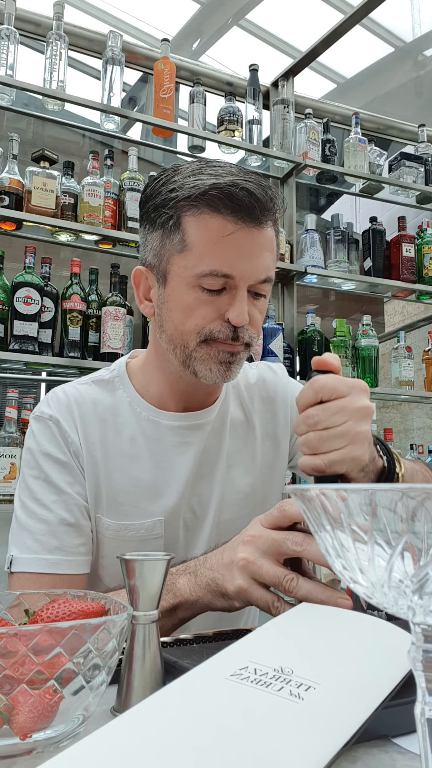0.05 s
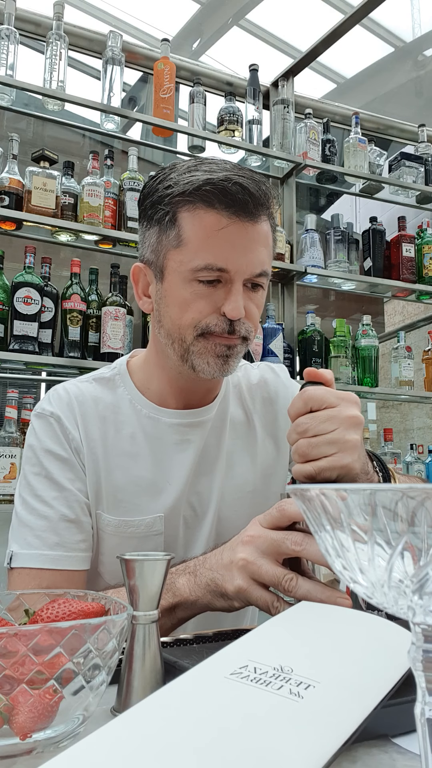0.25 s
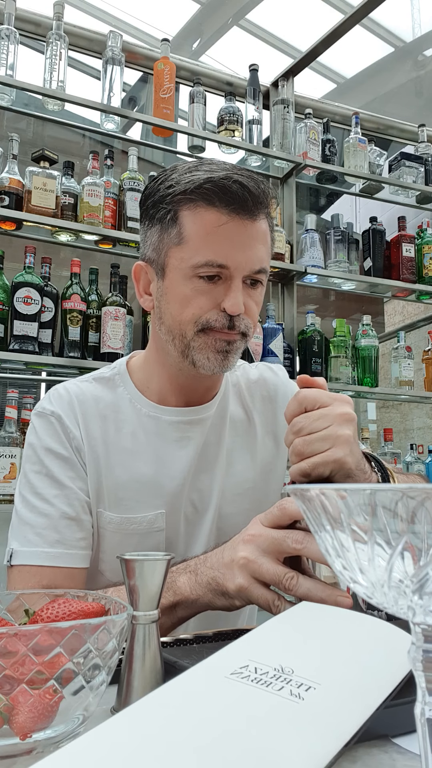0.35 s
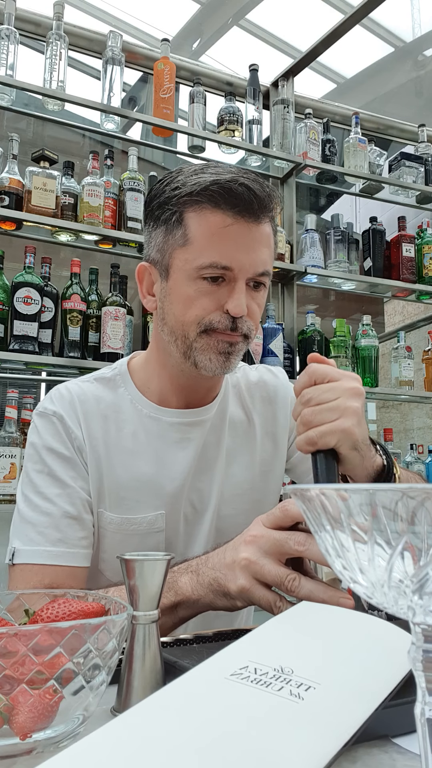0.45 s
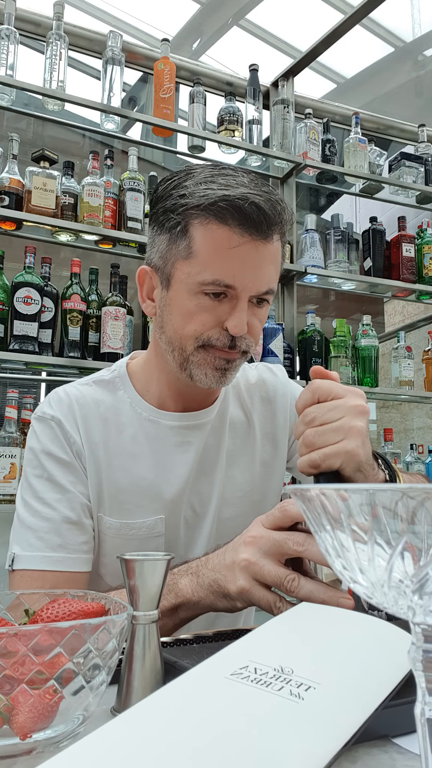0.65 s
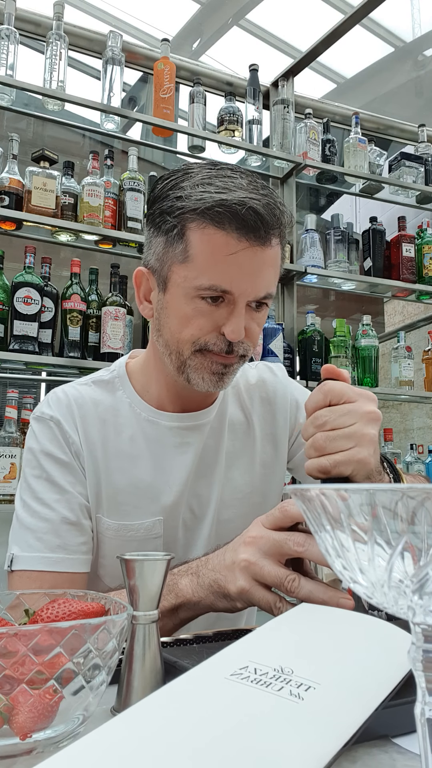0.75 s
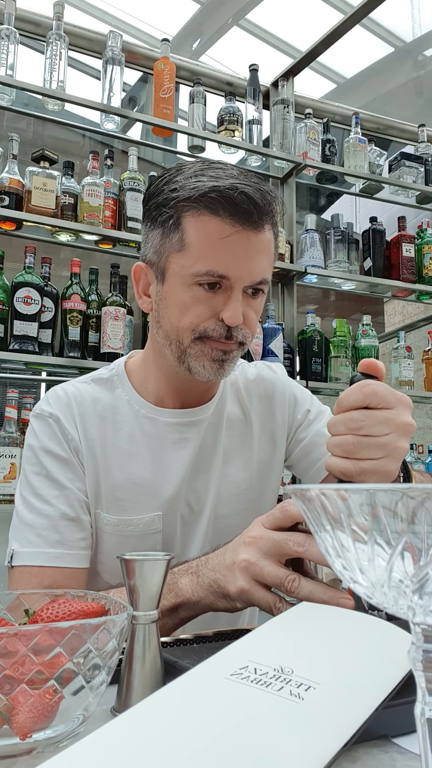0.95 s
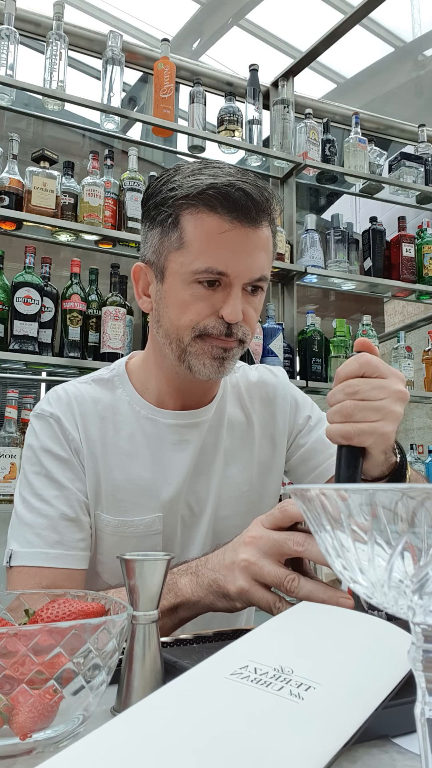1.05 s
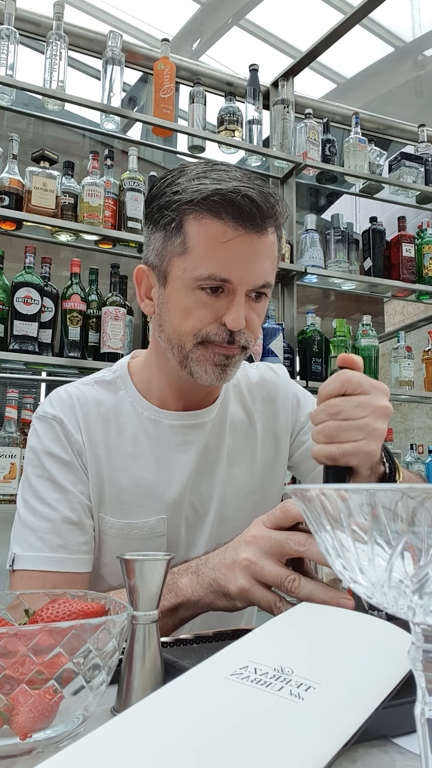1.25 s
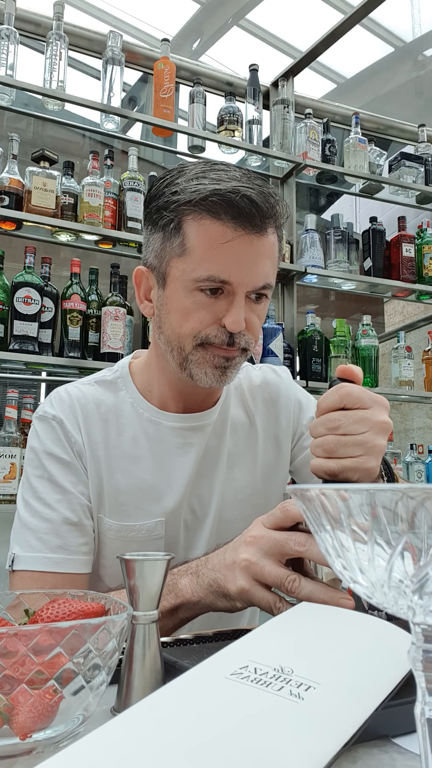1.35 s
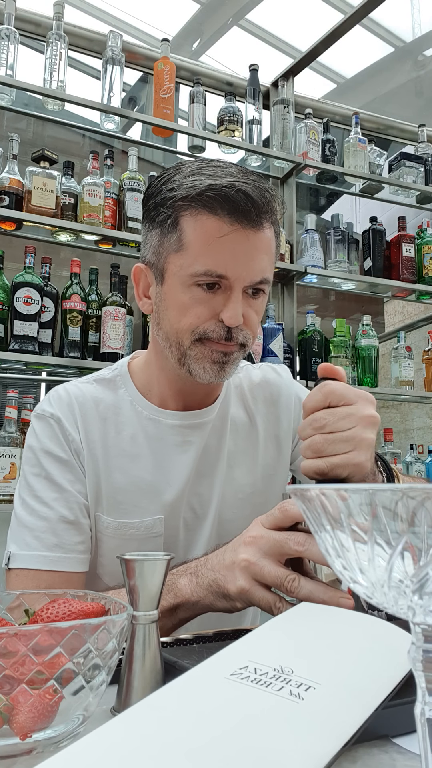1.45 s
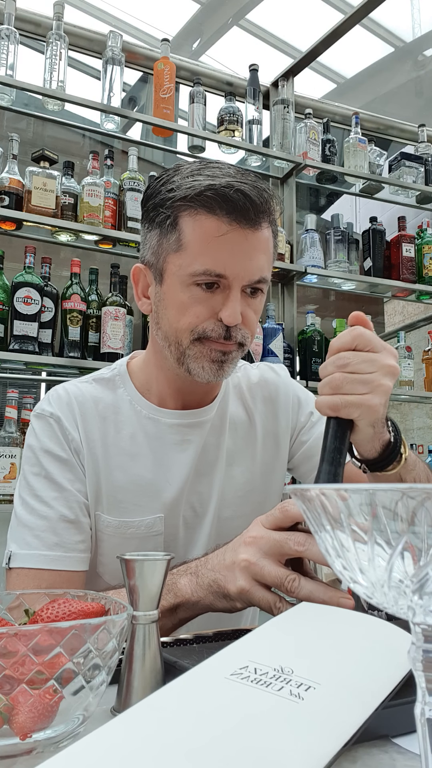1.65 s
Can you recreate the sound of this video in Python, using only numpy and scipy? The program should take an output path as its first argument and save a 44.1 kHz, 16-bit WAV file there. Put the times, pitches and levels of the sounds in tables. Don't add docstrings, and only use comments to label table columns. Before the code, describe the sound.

A muddler crushes fruit in a metal cup, close and to the right. Soft grinding and small taps lead to knocks near 0.2 s, a strong hollow knock at 0.34, wet squeaky grinding around 0.4 and the loudest blow at 0.58. Lighter knocks follow until 1.25, with a strap jingle at 1.06, a low drag from 1.1, then faint juice whistling over fridge hum and lively room hiss.

```python
import sys
import numpy as np
from scipy import signal
from scipy.fft import rfft, irfft
from scipy.io import wavfile
from scipy.ndimage import uniform_filter1d

SR = 44100
rng = np.random.default_rng(int(sys.argv[2]) if len(sys.argv) > 2 else 0)


def transcribe(signal):
    frames = np.atleast_2d(signal).T
    limited = np.clip(frames, -1, 1)
    pcm = np.round(limited * 32767).astype(np.int16)
    wavfile.write(sys.argv[1], SR, pcm)


def how_loud(loudness_db):
    steps = np.asarray(loudness_db, float) / 20
    return 10 ** steps


N = 74970
TIME = np.arange(N) / SR


def rms_one(x):
    return x / np.sqrt(np.mean(x ** 2) + 1e-20)


def in_time(rows):
    s, *columns = np.transpose(rows)
    return [np.interp(TIME, s, column) for column in columns]


def at_hz(points, hz):
    table_hz, value = np.transpose(points)
    return np.interp(np.log(hz + 1), np.log(table_hz), value)


def colour(x, points, share=1):
    hz = np.arange(N + 1) * SR / (2 * N)
    return irfft(rfft(x, 2 * N) * how_loud(share * at_hz(points, hz)), 2 * N)[..., :N]


def band(x, low_hz, high_hz):
    return signal.sosfilt(signal.butter(2, [low_hz, high_hz], "band", fs=SR, output="sos"), x)


def noise():
    return rng.standard_normal(N)


def drift(rate_hz):
    every = 40
    r = np.exp(-2 * np.pi * rate_hz * every / SR)
    slow = signal.lfilter([1], [1, -2 * r, r * r], rng.standard_normal(N // every + 2002))[2000:]
    return np.interp(np.arange(N) / every, np.arange(len(slow)), rms_one(slow))


def tone(hz, db):
    return np.sqrt(2) * how_loud(db) * np.sin(2 * np.pi * np.cumsum(hz) / SR)


def ring(clicks, hz, t60):
    r = how_loud(-60 / (t60 * SR))
    w = 2 * np.pi * hz / SR
    return signal.lfilter([0, np.sin(w)], [1, -2 * r * np.cos(w), r * r], clicks + 1e-18)


def strike(s, db, modes, grains, spread_db, swell_s, centre_hz=None):
    reach_octaves, fall_db = 0.8, 6
    chance = rng.standard_normal((len(s), len(modes)))
    out = 0
    for k, (hz, level_db, t60) in enumerate(modes):
        off_db = 0
        if centre_hz is not None:
            off_db = -fall_db * (np.log2(hz / centre_hz) / reach_octaves) ** 2
        clicks = grains.copy()
        clicks[(s * SR).astype(int)] += how_loud(db + off_db + spread_db * chance[:, k])
        swelling = ring(clicks, hz, t60) - ring(clicks, hz, min(swell_s, t60 / 2))
        out = out + (-1) ** k * how_loud(level_db) * swelling
    return out


def burst(s, db, decay_s, low_hz, high_hz):
    clicks = np.zeros(N)
    clicks[(s * SR).astype(int)] = how_loud(db)
    envelope = signal.lfilter([1], [1, -np.exp(-1 / (decay_s * SR))], clicks)
    return rms_one(band(noise(), low_hz, high_hz)) * envelope


def slips(rows, rough):
    waver, flutter = drift(100), drift(280)
    out = 0
    for s, length, hz, db in rows:
        arch = np.sin(np.pi * np.clip((TIME - s) / length, 0, 1))
        out = out + tone(hz * (1 + rough * waver), db + 2 * flutter) * arch
    return out


def muddler():
    grains, juice = grinding()
    return blows(grains) + rub(grains) + hollow(grains) + counter(grains) + juice


# (time [s], crack level [dB], crack centre [Hz], bright tick level [dB])
BLOW_TIMES = [(0.0288, -42, 3280, -73), (0.0415, -37, 5200, -62), (0.1486, -36, 5370, -58),
              (0.212, -55, 5040, -57), (0.2181, -27, 1770, -31.5), (0.2405, -47, 5000, -50),
              (0.2525, -29, 2700, -35.5), (0.3402, -16, 3350, -36.5), (0.382, -30, 2840, -65),
              (0.4409, -29.5, 4020, -69), (.5818, -11, 3230, -31), (.6400, -34, 2560, -51),
              (.6644, -36.5, 5030, -59), (0.799, -72, 5900, -60), (.814, -34.5, 1290, -57.5),
              (.8686, -28.5, 3400, -38), (0.911, -42.5, 1403, -57), (0.9636, -32.5, 1880, -89),
              (0.98, -41, 2040, -75), (1.1022, -31, 1650, -56), (1.2328, -28, 4850, -38),
              (1.2515, -26.5, 4300, -28.5)]
# (frequency [Hz], level [dB], t60 [s])
WALL_MODES = [(1073, 3.5, 0.0087), (1627, 1.5, 0.019), (2226, -12, 0.039), (2645, -5.5, 0.012),
              (2873, -9, 0.019), (3480, -2.5, 0.0092), (4200, -4.5, 0.02), (4620, -21, 0.021),
              (6210, 3, 0.0045), (7420, -4.5, 0.009)]


def blows(grains):
    s, crack_db, centre_hz, tick_db = np.transpose(BLOW_TIMES)
    wall = strike(s, crack_db - 4, WALL_MODES, grains * how_loud(-5.5), 2, 0.0011, centre_hz)
    crack = burst(s, crack_db - 8, 0.0033, 900, 5620)
    tick = burst(s, tick_db + 5, 0.0016, 7900, 16100)
    return wall + crack + tick


# (time [s], level [dB], pitch [Hz], t60 [s])
HOLLOW_RINGS = [(.0284, -43.5, 876, 0.046), (.0434, -36, 822, 0.046), (.085, -46, 860, 0.027),
                (.2177, -19, 767, 0.014), (.228, -33, 736, 0.03), (.2537, -33.5, 940, 0.024),
                (.3420, -13, 790, 0.019), (.382, -38, 870, 0.018), (.4424, -28.5, 774, 0.032),
                (.5828, -8.5, 790.5, 0.061), (.638, -29, 824, 0.087), (.650, -34, 734, 0.11),
                (.693, -40, 787, 0.05), (.745, -43, 774.5, 0.14), (.814, -31, 753, 0.036),
                (.8686, -48.5, 810, 0.061), (.918, -40, 760, 0.047), (.9637, -53, 815, 0.057),
                (.982, -47.5, 795, 0.047), (1.1023, -27.5, 853, 0.024), (1.2331, -35, 771, 0.11),
                (1.2515, -27.5, 790, 0.063), (1.285, -52, 769, 0.24)]
# (pitch ratio [1], level [dB])
HOLLOW_PARTNERS = [
    (.9, -5.5),
    (1.1, -15),
]
# (frequency [Hz], level [dB], t60 [s])
HOLLOW_MODES = [(717.6, 0, 0.063), (770, -1, 0.031), (870, -4, 0.027)]


def hollow(grains):
    none = np.zeros(0)
    out = strike(none, none, HOLLOW_MODES, grains, 1, 0.025)
    for s, db, hz, t60 in HOLLOW_RINGS:
        t = np.maximum(TIME - s, 0)
        tones = np.sin(2 * np.pi * hz * t)
        for ratio, side_db in HOLLOW_PARTNERS:
            tones = tones - how_loud(side_db) * np.sin(2 * np.pi * hz * ratio * t)
        swell = 1 - np.exp(-t / 0.0018)
        out = out + how_loud(db + 1.5 - 60 * t / t60) * swell * tones
    return out


# (time [s], thud level [dB], knock level [dB])
FOOT_FALLS = [(0.2175, -36, -40.5), (0.2541, -53, -39.5), (.29, -52, -44), (0.3406, -23.5, -20.5),
              (0.382, -31.5, -30.5), (0.5811, -24, -19.5), (0.6444, -41, -50), (0.812, -28, -41),
              (0.8687, -41.5, -42), (0.921, -48, -50), (1.101, -43, -36.5), (1.2517, -41.5, -40)]
# (frequency [Hz], level [dB], t60 [s])
COUNTER_MODES = [(105.2, -20.5, 0.58), (134, 4.5, 0.035), (173.5, -0.5, 0.069), (250.6, -1.5, 0.042)]
# (frequency [Hz], level [dB], t60 [s])
KNOCK_MODES = [(329.5, -4.5, 0.06), (442, 4, 0.05), (596, -7, 0.047)]


def counter(grains):
    s, thud_db, knock_db = np.transpose(FOOT_FALLS)
    thud = strike(s, thud_db + 3, COUNTER_MODES, grains * how_loud(-5), 1, 0.015)
    knock = strike(s, knock_db, KNOCK_MODES, grains * how_loud(-15.5), 1.5, 0.0043)
    return thud + knock


# (time [s], grind level [dB], wet hiss level [dB])
PRESSURE = [(0, -43.5, -57), (.06, -45.5, -54.5), (.14, -53, -56.5), (.21, -52, -66), (.335, -57.5, -68),
            (.35, -52, -61), (.405, -39, -56), (.437, -36, -52.5), (.465, -94, -67), (.55, -65, -70),
            (.68, -48.5, -61.5), (.78, -57.5, -103), (.92, -57.5, -70), (.985, -62, -80), (1.03, -78, -82),
            (1.22, -59.5, -80), (1.27, -46, -57.5), (1.4, -59, -73)]


def grinding():
    grind_db, hiss_db = in_time(PRESSURE)
    grains_per_s = 2500
    sizes = how_loud(4.1 * np.minimum(rng.exponential(1, N), 5)) * rng.choice([-1, 1], N)
    present = rng.random(N) < grains_per_s / SR
    grains = rms_one(sizes * present) * how_loud(grind_db - 25 + drift(52))
    juice = rms_one(band(noise(), 7700, 14500)) * how_loud(hiss_db + 0.66 * drift(30))
    return grains, juice


# (frequency [Hz], level [dB], t60 [s])
DAMPED_MODES = [(1577, 7, 0.0046), (2580, 7, 0.0057), (4210, -8, 0.0075), (4820, 0, 0.004),
                (6550, -5, 0.01)]


def rub(grains):
    regrip_s, loose_pitch = 0.19, 1.135
    loose = np.arange(N) < regrip_s * SR
    out = 0
    for hz, db, t60 in DAMPED_MODES:
        before = ring(grains * loose, hz * loose_pitch, t60)
        after = ring(grains * ~loose, hz, t60)
        out = out + how_loud(db + 1.5 * drift(8)) * (before + after)
    return out


# (time [s], length [s], frequency [Hz], level [dB])
TIP_SLIPS = [(.347, .010, 2300, -40), (.368, .011, 4850, -48), (.381, .016, 4850, -47),
             (.409, .015, 1500, -40), (.421, .011, 1500, -35), (.407, .014, 2600, -45),
             (.422, .013, 2550, -38), (.433, .017, 2570, -37), (.419, .018, 4170, -41),
             (.435, .014, 4100, -44), (.434, .011, 5750, -45), (.45, .09, 2580, -59),
             (1.555, .03, 1470, -63), (0, .13, 2960, -59), (.905, .03, 1400, -58)]


def wet_slips():
    return how_loud(2) * slips(TIP_SLIPS, 0.008)


# (time [s], frequency [Hz], level [dB])
JUICE_WHISTLE = [(1.33, 13800, -130), (1.36, 14300, -83), (1.415, 15800, -79), (1.45, 14500, -82),
                 (1.485, 12900, -86), (1.52, 12500, -95), (1.56, 13100, -85), (1.62, 13650, -82),
                 (1.7, 13400, -84)]
# (time [s], length [s], frequency [Hz], level [dB])
SECOND_SQUEAK = (1.485, .055, 15550, -78)


def squeak():
    hz, db = in_time(JUICE_WHISTLE)
    glide = uniform_filter1d(hz, size=1800) * (1 + 0.007 * drift(250))
    return tone(glide, db - 1 + 3.5 * drift(60)) + slips([SECOND_SQUEAK], 0.004)


# (time [s], level [dB])
LINK_TOUCHES = [
    (.965, -74),
    (0.975, -59),
    (1.013, -53),
    (1.057, -37.5),
    (1.065, -57),
    (1.076, -60),
    (1.109, -55.5),
]
# (frequency [Hz], level [dB], t60 [s])
LINK_MODES = [(8840, -10.5, 0.026), (10500, -32, 0.068), (11300, -8, 0.031), (11810, -29, 0.023),
              (12310, -14, 0.04), (13290, -15, 0.071), (14430, -13.5, 0.091), (15070, -28, .03),
              (15620, -21, 0.045)]


def strap():
    s, db = np.transpose(LINK_TOUCHES)
    links = strike(s, db, LINK_MODES, np.zeros(N), 2, 0.00043)
    return links + burst(s, db - 12, 0.0012, 4000, 18000)


# (time [s], level [dB])
DRAG_LEVEL = [
    (1.07, -66),
    (1.11, -49),
    (1.17, -48),
    (1.21, -51),
    (1.28, -50),
    (1.36, -57),
    (1.45, -73),
]


def drag():
    db, = in_time(DRAG_LEVEL)
    return rms_one(band(band(noise(), 72, 137), 64, 180)) * how_loud(db)


# (time [s], hum level [dB], level of the tone half above [dB])
FRIDGE_LEVELS = [(0, -37, -55.5), (.17, -37.5, -47), (.3, -36.5, -53), (.37, -39.5, -42.5), (.53, -41, -57),
                 (.68, -40, -50.5), (.88, -38, -54.5), (1.0, -47, -62), (1.1, -55, -48.5),
                 (1.28, -45.5, -47.5), (1.45, -44, -52), (1.56, -54, -61), (1.7, -61, -49)]


def fridge():
    hum_hz = 49.7
    db, upper_db = in_time(FRIDGE_LEVELS)
    return tone(np.full(N, hum_hz), db) + tone(np.full(N, hum_hz * 3 / 2), upper_db)


# (frequency [Hz], likeness [1])
CHANNEL_LIKENESS = [(60, 1), (180, 1), (550, 0.79), (1650, 0.83), (4970, -0.53), (15000, -1.1)]


def air(spectrum, patchy_db):
    lowest_hz, highest_hz = spectrum[0][0], spectrum[-1][0]
    together = drift(2)
    edges = np.minimum(lowest_hz * 2 ** np.arange(0, 6.1, 0.5), 17000)
    white = rng.standard_normal((2, 2, N))
    out = 0
    for k, (low, high) in enumerate(zip(edges, edges[1:])):
        if high > low:
            alike = np.clip(at_hz(CHANNEL_LIKENESS, np.sqrt(low * high)), -1, 1)
            flicker = how_loud(patchy_db * (0.55 * together + drift(7.3)))
            mid, side = band(white[k % 2], low, high) * flicker
            out = out + np.sqrt(1 + alike) * mid + np.sqrt(1 - alike) * side * [[1], [-1]]
    skirts = [(lowest_hz * 0.6, -60)] + list(spectrum) + [(highest_hz * 1.2, -60)]
    return rms_one(colour(out, skirts))


# (time [s], level [dB])
HISS_LEVEL = [(0, -52), (.3, -64), (.55, -61), (.8, -72.5), (1.08, -69), (1.2, -65.5), (1.35, -57),
              (1.7, -64.5)]
# (frequency [Hz], density [dB per Hz])
LOW_AIR = [(35, 3), (60, -6), (71, -23), (181, -12), (312, -16.5), (347, -18), (1000, -38.5), (1300, -75),
           (2200, -120)]
HIGH_AIR = [(1000, -20), (1800, -14), (2750, -3), (3700, -9), (6000, -12), (7800, -9), (8900, -38),
            (16000, -35)]


def room_hiss():
    hiss_db, = in_time(HISS_LEVEL)
    low_db = -50 + 0.5 * (hiss_db - hiss_db.mean())
    return how_loud(hiss_db) * air(HIGH_AIR, patchy_db=1) + how_loud(low_db) * air(LOW_AIR, patchy_db=3)


# (frequency [Hz], t60 [s])
ROOM_DECAY = [(100, 1), (750, 0.48), (2500, 0.58), (6000, 0.29), (9000, 0.45), (14000, 0.3)]


def room(x):
    t = np.arange(SR) / SR
    edges = 80 * 2 ** np.arange(0, 8.1, 0.5)
    white = rng.standard_normal((2, 2, SR))
    white = white + band(white[:, :1] - white, 30, 600)
    tail = 0
    for k, (low, high) in enumerate(zip(edges, edges[1:])):
        decay = how_loud(-60 * t / at_hz(ROOM_DECAY, low))
        tail = tail + band(white[k % 2], low, min(high, 20000)) * decay
    tail = tail * (1 - np.exp(-t / 0.016)) * how_loud(-6 - 36.5)
    sparse = white[0, :, ::-1] * (rng.random((2, SR)) < 0.02)
    early = sparse * np.exp(-t / 0.019) * (t > 0.001) * how_loud(-10 - 6)
    return signal.fftconvolve(x[None], tail + early, axes=1)[:, :N]


# (frequency [Hz], level [dB])
MIC_RESPONSE = [(100, -1), (6000, 0.5), (7800, -4.5), (9200, -15), (11000, -7.5), (15500, 1)]
# (frequency [Hz], level [dB])
LEFT_OVER_RIGHT = [(60, -7), (150, -3.5), (380, 0), (950, -11.5), (2380, -6.5), (5980, -9), (15000, -16)]


def scene():
    lag_s, shade_db = 0.0001, -5
    near = muddler() + squeak()
    links = strap() + wet_slips()
    direct = near + links
    late = np.interp(np.arange(N) - lag_s * SR, np.arange(N), direct)
    close = np.array([how_loud(shade_db) * late, direct]) + room(near + links / 4)
    left, right = colour(close, MIC_RESPONSE) + room_hiss()
    left = colour(left, LEFT_OVER_RIGHT, 0.21)
    right = colour(right, LEFT_OVER_RIGHT, -0.55)
    return np.array([left, right]) + fridge() + drag()


def roll_off(x):
    return signal.sosfilt(signal.butter(12, 16990, fs=SR, output="sos"), x)


def record(dry):
    low_pass = signal.cheby2(12, 70, 16150 * 1.06, fs=SR, output="sos")
    mix = signal.sosfilt(low_pass, np.tanh(dry))
    return roll_off(mix)


dry = scene()
out = record(dry)
transcribe(out)
```